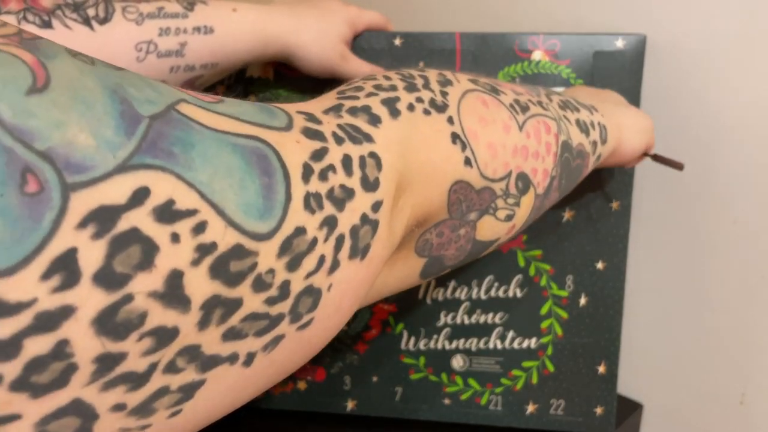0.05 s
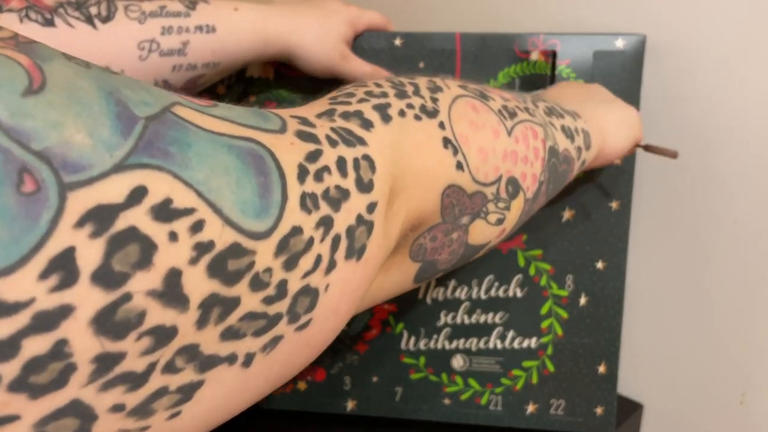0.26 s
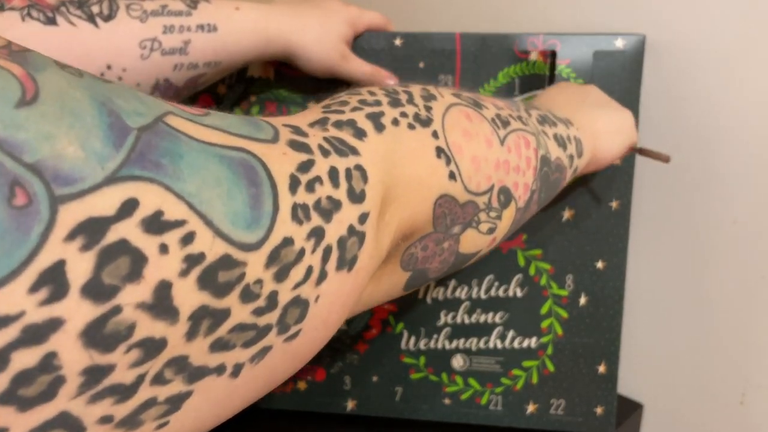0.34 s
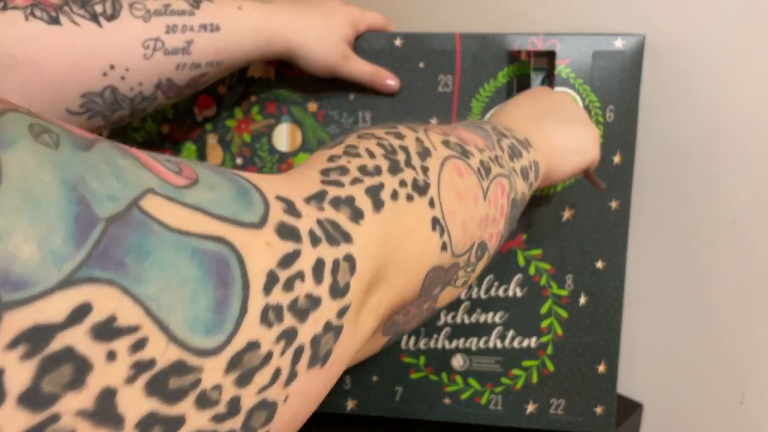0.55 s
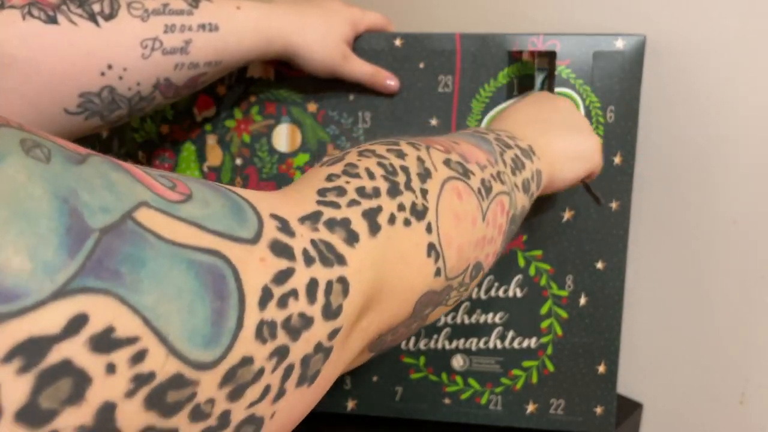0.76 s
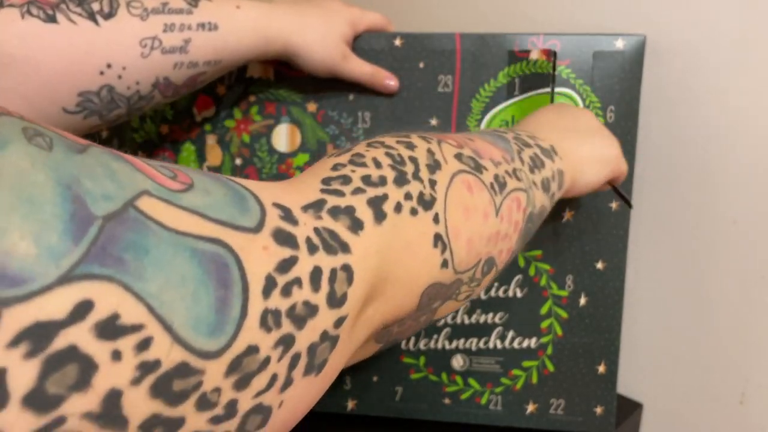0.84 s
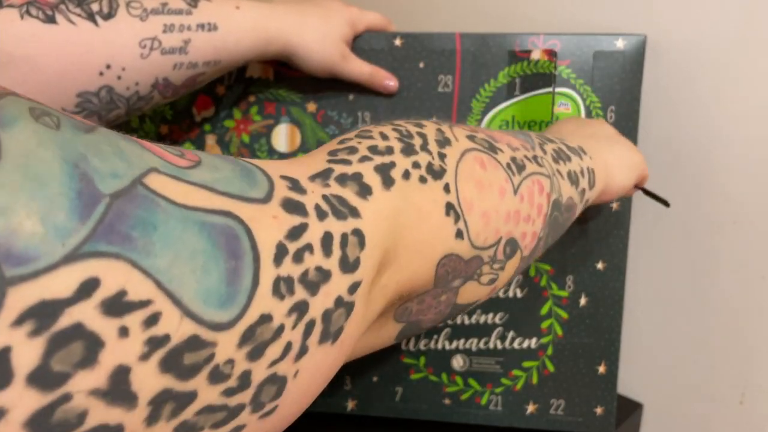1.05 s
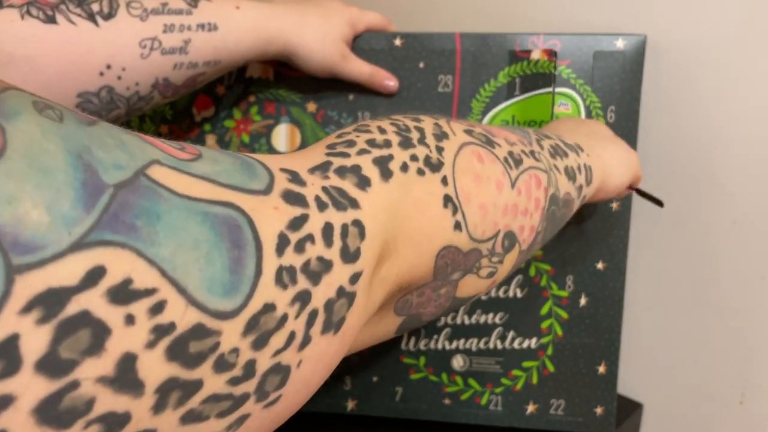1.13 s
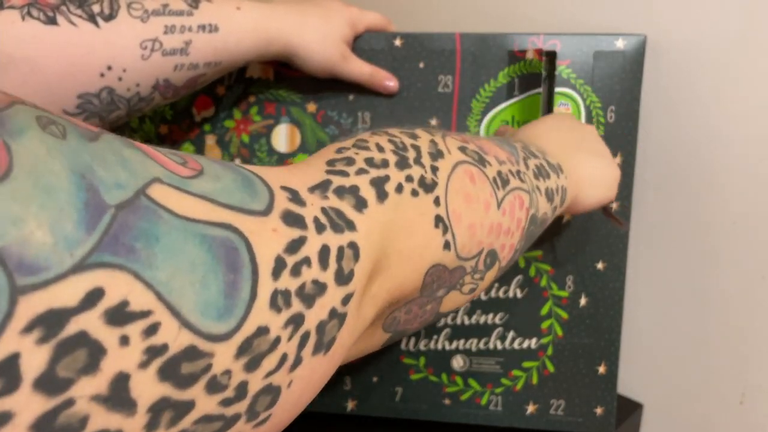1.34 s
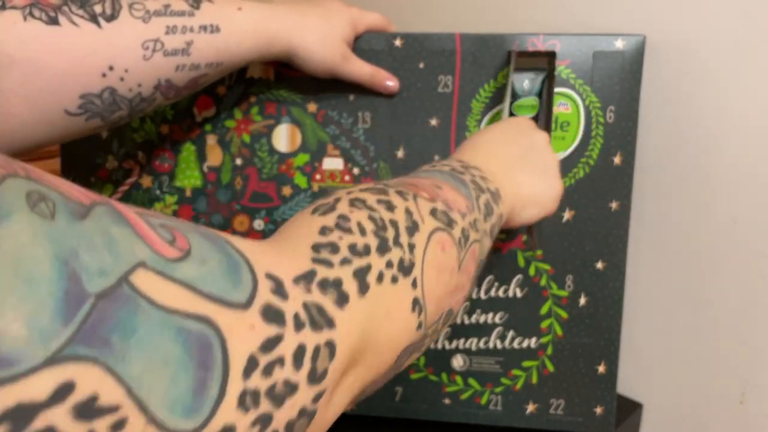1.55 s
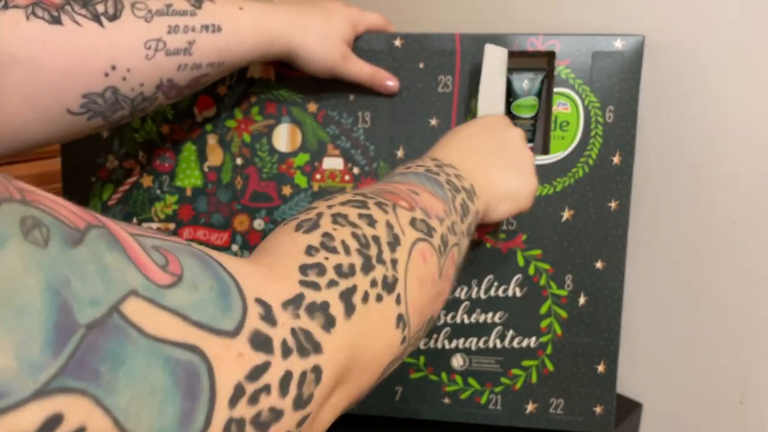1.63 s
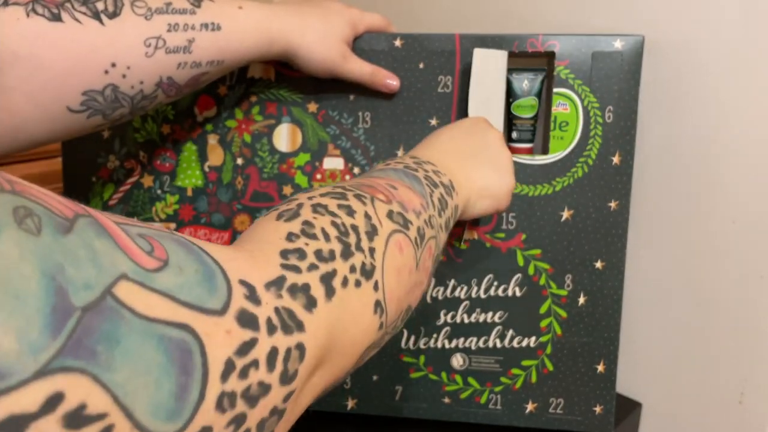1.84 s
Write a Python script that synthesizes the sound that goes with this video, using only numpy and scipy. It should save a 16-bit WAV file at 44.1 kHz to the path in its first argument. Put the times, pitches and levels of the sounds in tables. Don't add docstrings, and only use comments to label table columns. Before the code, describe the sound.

Cardboard flap tearing open, close up. Soft finger touches lead to a dense cluster of sharp cracks, rips and hollow booms at 0.2-0.3 seconds, another snap at 0.4 and a duller one near 0.55. From 0.65 to 1.4 only faint rubbing, ticks and small box knocks. Strong snaps return at 1.45 and 1.6, then quiet, dull fibre scrapes to the end. Small room, brief echo, low rumble and hiss.

```python
import sys
import numpy as np
from scipy import signal
from scipy.fft import rfft, irfft, next_fast_len
from scipy.io import wavfile
from scipy.ndimage import uniform_filter1d

SR = 44100
rng = np.random.default_rng(int(sys.argv[2]) if len(sys.argv) > 2 else 0)


def nominal_scale(level):
    x = np.asarray(level, float) / 20
    return 10 ** x


def to_wav(sig):
    pcm = np.clip(np.atleast_2d(sig), -1, 1) * 32767
    pcm = np.round(pcm).astype(np.int16)
    wavfile.write(sys.argv[1], SR, pcm.T)


N = 83790
FREE_S, FREE_DB = 1.7, -10
BLOW_S = 0.0037


def evened(x):
    return x / np.sqrt(np.mean(x ** 2) + 1e-20)


def read(points, hz):
    f, value = np.transpose(points)
    return np.interp(np.log(hz + 1), np.log(f + 1), value)


def add(mix, s, sound):
    part = mix[round(s * SR):][:len(sound)]
    part += sound[:len(part)]


def slow(count, size):
    once = uniform_filter1d(rng.standard_normal(count), size)
    return evened(uniform_filter1d(once, size))


def colour(x, points):
    cep = irfft(read(points, np.fft.rfftfreq(4096, 1 / SR)) * np.log(10) / 20)
    folded = np.r_[cep[0], 2 * cep[1:2048], np.zeros(2048)]
    taps = irfft(np.exp(rfft(folded)))[:2048]
    return signal.oaconvolve(x, taps / np.linalg.norm(taps))[:len(x)]


def ring(modes, gains):
    t = np.arange(round(.3 * SR)) / SR
    y = 0
    for (hz, db, t60), gain in zip(modes, gains):
        y = y + gain * nominal_scale(db - 60 * t / t60) * np.sin(2 * np.pi * hz * t)
    return y / abs(y).max()


def resonate(x, hz, width_hz):
    r = np.exp(-np.pi * width_hz / SR)
    y = signal.lfilter([1, 0, -1], [1, -2 * r * np.cos(2 * np.pi * hz / SR), r * r], x)
    return y * np.linalg.norm(x) / np.linalg.norm(y)


def grains(count, per_s):
    chance, size, sign = rng.random((count, 3)).T
    heights = nominal_scale(-2.5 * np.log(size + 0.0033))
    return evened((chance < per_s / SR) * heights * np.sign(sign - .5))


def crack(db, decay_s):
    t = np.arange(2000) / SR
    x = grains(2000, 12000) + 0.55 * rng.standard_normal(2000)
    ragged = nominal_scale(4 * evened(uniform_filter1d(x[::-1], size=80)))
    crackle = np.exp(-t / 0.048) * ragged * signal.lfilter(*signal.butter(1, 4000, fs=SR), x)
    x = x * np.exp(-t / decay_s) + 0.1 * crackle
    edge_hz = np.clip(3000 * 2 ** ((db + 49.5) / 5), 1000, 18000)
    return nominal_scale(db - 2) * signal.lfilter(*signal.butter(2, edge_hz, fs=SR), x * np.minimum(t * 2000, 1))


# (pitch [Hz], level [dB], decay t60 [s])
BOX = [(155, 4, 0.042), (204.1, -3, .12), (236, -7, 0.36), (243.85, -3, 0.22), (293.8, 0, 0.15),
       (347.8, 3, 0.1), (432, 9.5, 0.039)]
# (pitch [Hz], level [dB], decay t60 [s])
PANEL = [(510.6, 5.5, 0.083), (588.6, 5, 0.11), (657, -2.5, 0.12), (720, -2, 0.13), (789, 3, 0.07),
         (929, -4, 0.11), (1050, -7.5, 0.074), (1125.4, 5, .07), (1455, -8.5, 0.15), (1663, -11, 0.086),
         (1745, -14, 0.014), (2006, -5.5, 0.055), (2260, -19, 0.063), (2830, -16.5, 0.026)]


def knock(panel_db, box_db, box_hz, blow_s):
    spot = rng.standard_normal(len(PANEL))
    blow = (1 + 1.1 * rng.standard_normal(900)) * np.exp(-np.arange(900) / SR / blow_s)
    near = []
    for k, (hz, _, _) in enumerate(BOX):
        away = np.log(hz / box_hz) / 0.26
        near.append((-1) ** k * (0.23 + 1 / (1 + away ** 2)))
    lid = signal.fftconvolve(ring(PANEL, nominal_scale(6 * spot) * np.sign(spot)), blow)
    lid = signal.lfilter(*signal.butter(2, 400, "high", fs=SR), lid)
    box = signal.fftconvolve(ring([(box_hz, 3, .09)] + BOX, [1] + near), abs(blow))
    box *= nominal_scale(3 * slow(len(box), size=250))
    box = signal.sosfilt(signal.butter(4, 150, "high", fs=SR, output="sos"), box)
    return nominal_scale(panel_db) * lid / abs(lid).max() + nominal_scale(box_db) * box / abs(box).max()


# (time [s], crack level [dB], panel level [dB], box level [dB], box pitch [Hz])
SNAPS = [(.197, -23.5, -22, -34.5, 720), (0.232, -16.5, -18.5, -25, 370), (0.2664, -21, -17.5, -18.5, 314),
         (0.2932, -21, -22.5, -24, 300), (0.3027, -36, -24, -28, 325), (.411, -17.5, -22, -28, 593),
         (0.543, -31, -27.5, -29.5, 247), (0.5574, -44, -39.5, -31.5, 254.3),
         (1.0933, -47, -51, -47.5, 296), (1.453, -24, -26.5, -28, 317.5), (1.466, -41, -32, -29, 312),
         (1.5924, -24, -21, -23.5, 288), (1.743, -47, -42, -45.5, 432)]
FLAP_HZ = [2460, 1600, 2200, 2000, 2000, 3550, 3700, 1510, 1593, 3670, 2474, 5060, 1100]
# (time [s], tick level [dB], body level [dB], tick pitch [Hz])
TICKS = [
    (0.047, -55, -33.5, 1490),
    (0.163, -53, -38.5, 1376),
    (1.1462, -55.5, -44, 2000),
    (1.181, -58.5, -62, 2500),
    (1.2685, -53.5, -38.5, 1804),
    (1.292, -55.5, -39.5, 1400),
]
# (frequency [Hz], level [dB])
CRACK = [(300, -3.5), (1000, 7), (2300, -0.5), (3000, -7), (5000, -11), (8000, -11), (11000, -21),
         (15500, -27.5)]


def tabs():
    sharp, body = np.zeros((2, N))
    for (s, crack_db, panel_db, box_db, hz), flap_hz in zip(SNAPS, FLAP_HZ):
        x = crack(crack_db, 0.0023)
        add(sharp, s, 1.027 * x + 0.29 * resonate(x, flap_hz, 350))
        add(body, s, knock(panel_db + 1.0, box_db + 4.5, hz, BLOW_S))
    for s, tick_db, body_db, hz in TICKS:
        x = crack(tick_db, 0.0022)
        add(body, s, 3.0 * resonate(x, hz, 500))
        add(sharp, s, 0.18 * x)
        add(body, s, knock(body_db - 17.0, body_db - 11, 230, BLOW_S))
    return colour(sharp, CRACK) + body


# (start [s], length [s], level [dB], pitch [Hz], body level [dB])
RIPS = [(0.185, 0.0097, -53.5, 2000, -49.5), (0.251, 0.023, -34, 2200, -26),
        (0.2613, 0.0061, -27, 2000, -26), (.407, 0.0086, -34.5, 3150, -48),
        (0.4827, .015, -41.5, 2000, -42), (1.435, 0.021, -65.5, 2000, -56),
        (1.587, 0.016, -42, 3000, -72.5), (1.66, 0.0075, -52.5, 2420, -60),
        (1.769, 0.029, -54.5, 2000, -53), (1.8696, 0.016, -44, 2320, -45.5),
        (1.878, 0.027, -49, 3000, -45.5)]
# (frequency [Hz], level [dB])
FIBRE = [(300, -16.5), (1000, 3.5), (2500, 1.5), (5000, -7.5), (8000, -5), (11000, -11.5), (15500, -12.5)]


def rips():
    sharp, tone, push = np.zeros((3, N))
    for s, length, db, hz, body_db in RIPS:
        x = grains(1600, 2300) + 0.22 * rng.standard_normal(1600)
        u = np.arange(1600) / SR / length
        x = x * np.clip(u * 4, 0, 1) * np.clip((1 - u) * 5, 0, 1)
        add(sharp, s, nominal_scale(db - 8 + FREE_DB * (s > FREE_S)) * x)
        add(tone, s, nominal_scale(db - 5.5) * resonate(resonate(x, hz, 2200), hz, 1300))
        add(push, s, nominal_scale(body_db) * x)
    lid = ring(PANEL + BOX, (-1) ** np.arange(len(PANEL + BOX)))
    lid_sound = signal.fftconvolve(push, lid / np.linalg.norm(lid))[:N]
    return colour(sharp, FIBRE) + tone + lid_sound


# (time [s], level [dB], flap pitch [Hz], brightness [dB])
FIBRES = [(1.598, -29.5, 1050, -13), (0.1922, -47.5, 1900, -5.5), (0.2595, -36, 1690, 3.5),
          (0.2638, -25.5, 1760, 1), (0.2997, -37.5, 2430, -3), (0.4859, -42, 1850, 3.5),
          (.4932, -37, 1550, 3), (.535, -49.5, 3000, 7.5), (0.6873, -63.5, 3000, 6.5),
          (0.7146, -69, 2487, 5), (.724, -75, 3000, 0), (0.7838, -62, 1810, -12.5), (0.8177, -56, 2060, -2),
          (1.2295, -61, 1800, -20), (1.3123, -60.5, 2200, -14.5), (1.325, -66, 4000, -18),
          (1.6637, -44, 1100, -1), (1.7701, -42.5, 1550, -5.5), (1.777, -55, 3130, -9),
          (1.81, -49, 2400, -15), (1.8717, -35.5, 2380, -11.5), (1.877, -48.5, 3230, -10),
          (1.883, -44, 2850, -8.5), (1.887, -44, 3000, -8), (.241, -27.5, 1100, -11),
          (0.2631, -19, 2200, -15), (0.275, -29, 1100, -11), (.2345, -18.5, 1500, -15),
          (.306, -33, 1180, -10), (1.164, -57, 982, -10)]
# (time [s], panel level [dB], box level [dB], box pitch [Hz])
FLEXES = [
    (0.067, -54, -53.5, 247),
    (.09, -50.5, -43, 256),
    (0.284, -24, -22, 303),
    (.312, -51, -30, 280),
    (0.809, -71, -54, 249.3),
    (0.834, -66.5, -57, 254),
    (1.116, -61, -49.5, 220),
    (1.752, -51.5, -48, 432),
    (1.82, -55, -49.5, 270),
]


def fibres():
    sharp, tone, t = np.zeros(N), np.zeros(N), np.arange(600) / SR
    for s, db, hz, bright_db in FIBRES:
        x = nominal_scale(db) * rng.standard_normal(600) * np.exp(-t / 0.0028) * np.minimum(t * 3000, 1)
        add(sharp, s, nominal_scale(bright_db - 3 + FREE_DB * (s > FREE_S)) * x)
        add(tone, s, 0.78 * resonate(resonate(x, hz, 1100), hz, 550))
    for s, panel_db, box_db, hz in FLEXES:
        add(tone, s, knock(panel_db, box_db, hz, BLOW_S))
    return colour(sharp, FIBRE) + tone


# (middle [s], half-length [s], skin level [dB], weight on the box [dB])
STROKES = [(0, 0.02, -62.5, -46.5), (0.085, 0.031, -60.5, -60), (0.196, 0.049, -71.5, -57.5),
           (0.427, 0.029, -49.5, -36), (0.519, 0.046, -45, -53), (0.603, 0.061, -65, -54.5),
           (0.732, 0.017, -72, -72.5), (0.816, 0.038, -65.5, -61.5), (1.155, 0.037, -79.5, -63),
           (1.244, 0.0365, -73.5, -74), (1.325, 0.029, -70.5, -58.5), (1.558, 0.094, -59, -50.5),
           (1.661, 0.061, -59, -55), (1.808, 0.1, -65, -59.5)]
# (frequency [Hz], level [dB])
SKIN = [(900, 6), (1400, -1), (2200, -1), (3500, -5), (6000, -8.5), (10500, -12), (13000, -18.5),
        (16000, -25.5)]
# (start [s], end [s], level [dB], pitch [Hz], width [Hz])
SLIDE_HISS = (1.75, 1.87, -64, 6600, 1200)


def rub():
    t = np.arange(N) / SR
    mid, half, skin_db, weight_db = np.transpose(STROKES)
    swell = np.exp(-((t[:, None] - mid) / half) ** 2)
    skin = colour(grains(N, 900) + 0.91 * rng.standard_normal(N), SKIN)
    skin = np.where(t > FREE_S, resonate(resonate(skin, 2400, 2500), 2400, 2500), skin)
    gains = np.r_[np.ones(len(BOX)), .6 * np.ones(6)]
    box = ring(BOX + PANEL[:6], gains * (-1) ** np.arange(len(BOX) + 6))
    load = grains(N, 300) * (swell @ nominal_scale(weight_db))
    creak = signal.fftconvolve(load, box / np.linalg.norm(box))[:N]
    start, end, db, hz, width_hz = SLIDE_HISS
    brush = resonate(resonate(rng.standard_normal(N), hz, width_hz), hz, width_hz)
    brush *= np.clip(np.minimum(t - start, end - t) / 0.05, 0, 1)
    return evened(skin) * (swell @ nominal_scale(skin_db)) + creak + nominal_scale(db) * brush


# (start [s], length [s], level [dB], pitch [Hz])
HUMS = [
    (0.071, 0.04, -52, 251.4),
    (0.271, 0.041, -26, 290),
    (0.792, .09, -56.5, 251),
    (1.611, .06, -37, 300),
    (1.741, .032, -40.5, 432),
    (1.878, .03, -47.5, 292),
    (0.547, .045, -31.5, 248),
]


def hums():
    out = np.zeros(N)
    for s, length, db, hz in HUMS:
        u = np.arange(round(.1 * SR)) / SR / length
        wave = np.sin(2 * np.pi * np.cumsum(hz * (1 + 0.018 * slow(len(u), size=300))) / SR)
        swell = np.clip(np.minimum(u * 8, (1 - u) * 3), 0, 1)
        add(out, s, nominal_scale(db + 3.2 * slow(len(u), size=200)) * swell * wave)
    return out


# (time [s], level [dB], pitch [Hz])
THUDS = [(0.047, -46, 76), (0.249, -38, 116.4), (0.293, -29, 99), (0.42, -41, 110), (0.562, -32.5, 67.2),
         (0.701, -46.5, 58), (1.109, -47.5, 73.7), (1.3, -47.5, 70.4), (1.473, -28.5, 100),
         (1.607, -29.5, 72.2), (1.703, -42.5, 90), (1.809, -42.5, 75.5)]


def thuds():
    out, t = np.zeros(N), np.arange(round(.3 * SR)) / SR
    rise_s, t60_s = 0.0034, 0.15
    for s, db, hz in THUDS:
        wobble = slow(len(t), size=500)
        wave = np.sin(2 * np.pi * np.cumsum(hz * (1 + 0.08 * wobble)) / SR)
        add(out, s, nominal_scale(db - 60 * t / t60_s) * (1 - np.exp(-(t / rise_s) ** 2)) * wave)
    return out


def spread(x, hz, width_hz, db):
    paths = rng.standard_normal((2, 200)) * (rng.random((2, 200)) < .06)
    band = resonate(resonate(x, hz, width_hz), hz, width_hz)
    around = signal.lfilter(*signal.butter(1, [hz / 2, hz * 2], "band", fs=SR), x)
    band *= np.linalg.norm(around) / np.linalg.norm(band)
    turn = 2 * slow(N, size=3000)
    wide = np.zeros(N)
    for path, weight in zip(paths, (np.sin(turn), np.cos(turn))):
        wide += signal.fftconvolve(band * weight, path / np.linalg.norm(path))[:N]
    return nominal_scale(db) * np.outer([1, -1], wide)


# (frequency [Hz], t60 [s])
ROOM = [(100, 0.47), (400, 0.3), (3000, 0.35), (15000, 0.39)]
# (frequency [Hz], likeness [-1..1])
SAME = [(100, 0.9), (400, 0.82), (900, 0.59), (4000, 1), (12000, 1)]


def room(x):
    taps = np.zeros((2, SR // 2))
    at = np.arange(160, SR // 2 - 20, 20)
    places = at + rng.integers(0, 20, (2, len(at)))
    np.put_along_axis(taps, places, rng.choice([-1., 1.], (2, len(at))), 1)
    hz, t, z = signal.stft(taps, SR, nperseg=256)
    same = np.clip(read(SAME, hz) - 0.63 * (hz > 500), -1, 1)[:, None]
    z = np.array([z[0], same * z[0] + np.sqrt(1 - same ** 2) * z[1]])
    tail = signal.istft(z * nominal_scale(-60 * t / read(ROOM, hz)[:, None]), SR, nperseg=256)[1]
    return signal.fftconvolve(x[None], tail / np.linalg.norm(tail[0]), axes=1)[:, :N]


# (frequency [Hz], level [dB per Hz])
FLOOR = [(25, 3), (60, 2.5), (120, -9), (300, -16), (900, -27.5), (1700, -30), (6200, -45), (15500, -48)]


def floor():
    frames, hz = N // 256 + 5, np.fft.rfftfreq(1024, 1 / SR)
    a, b, c, d, patches = rng.standard_normal((frames, 513, 5)).T
    patches = evened(uniform_filter1d(uniform_filter1d(patches, 12, 0), 14, 1))
    same, left = np.clip(read(SAME, hz), -1, 1)[:, None], a + 1j * b
    z = np.array([left, same * left + np.sqrt(1 - same ** 2) * (c + 1j * d)])
    z *= nominal_scale(read(FLOOR, hz)[:, None] + 3.4 * patches)
    return nominal_scale(-63.5) * evened(signal.istft(z, nperseg=1024, noverlap=768)[1][:, :N])


def scene():
    hand = tabs() + rips() + fibres() + rub() + hums() + thuds()
    lid_wide = spread(hand, hz=650, width_hz=800, db=-7.5)
    flap_wide = spread(hand, hz=4500, width_hz=3000, db=-12)
    return hand + lid_wide + flap_wide + nominal_scale(-9.5) * room(hand) + floor()


def low_pass(x):
    return signal.sosfilt(signal.butter(12, 15930, fs=SR, output="sos"), x)


# (frequency [Hz], left leads by [rad])
LEAD = [(900, 0), (2070, -.4), (2840, .3), (4900, .4), (6290, -.8), (7670, -2.7), (10900, -6.1),
        (15500, -9.5)]
# (frequency [Hz], left minus right [dB])
TILT = [(200, .3), (600, 1.5), (1300, 0), (5000, 3.2), (10000, -.3)]


def record(dry):
    size = next_fast_len(N + 4096)
    hz = np.fft.rfftfreq(size, 1 / SR)
    port = nominal_scale(read(TILT, hz) / 2) * np.exp(.5j * read(LEAD, hz))
    band = (hz < 15950) / (1 + (38 / (hz + 1)) ** 4)
    z = rfft(dry, size) * np.array([port, 1 / port]) * band
    return low_pass(irfft(z, size)[:, :N])


dry = scene()
out = record(dry)
to_wav(out)
```